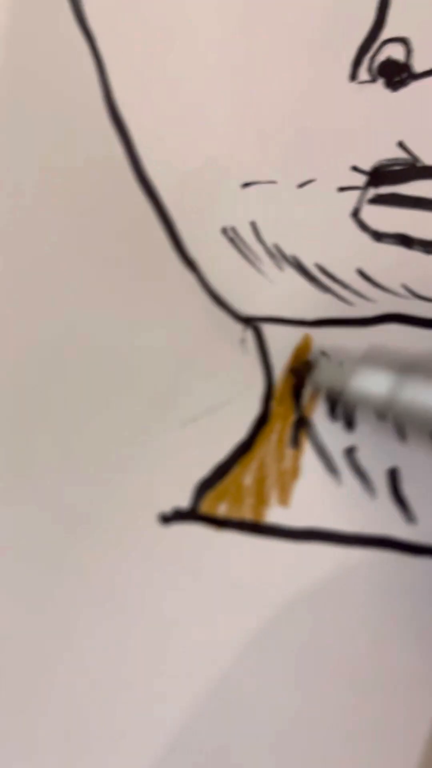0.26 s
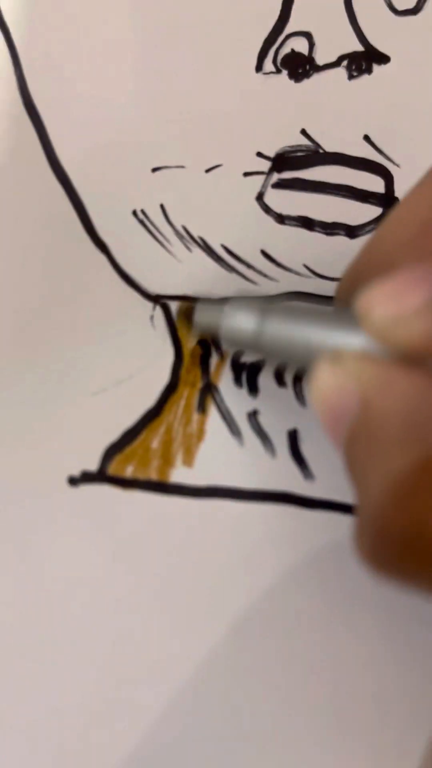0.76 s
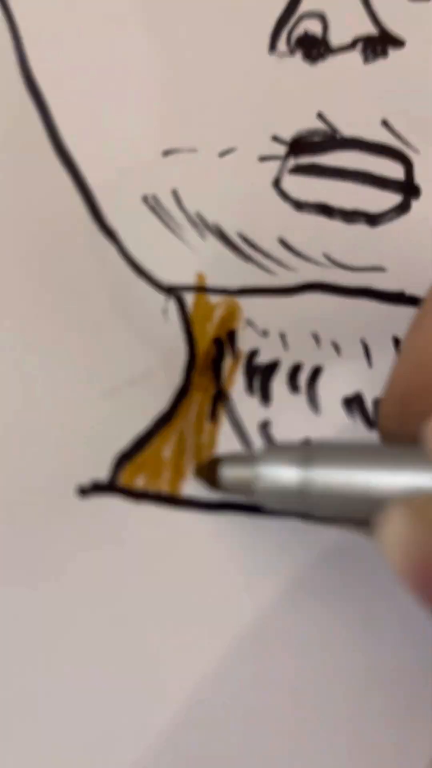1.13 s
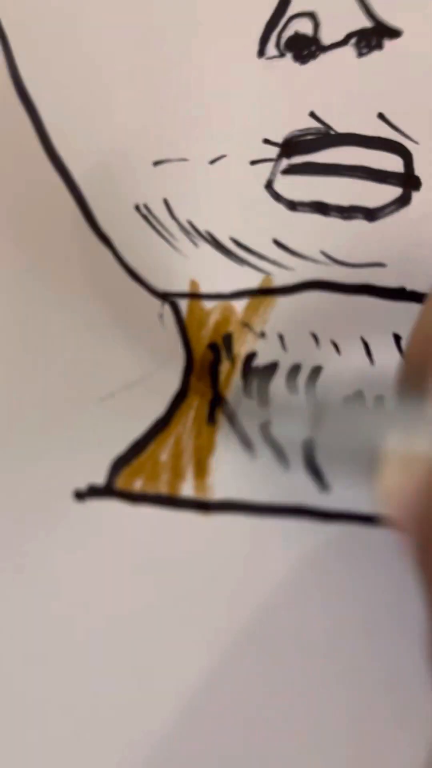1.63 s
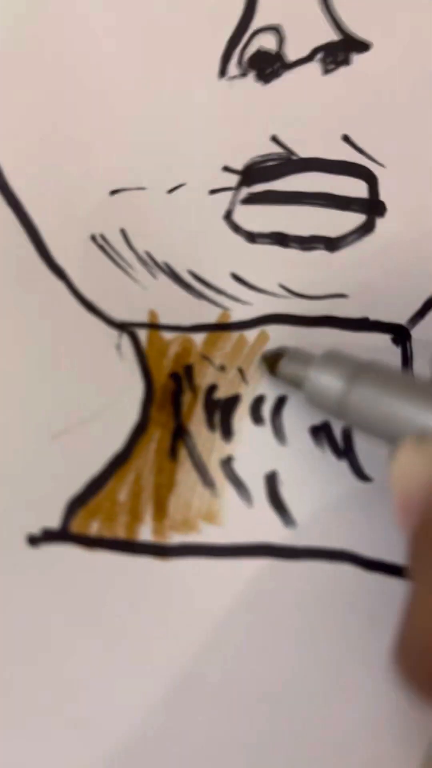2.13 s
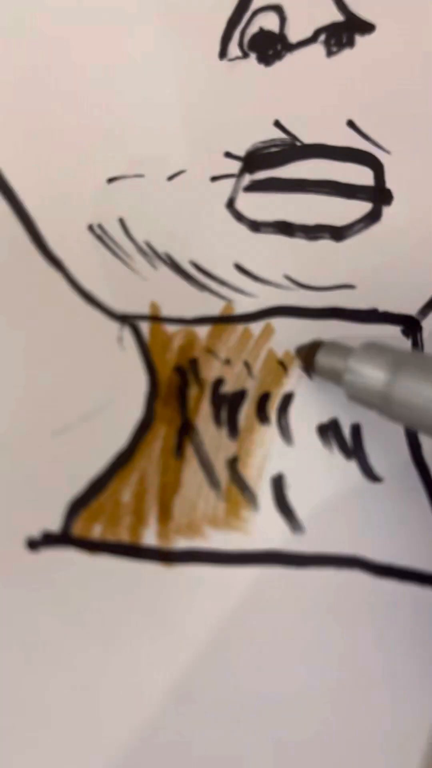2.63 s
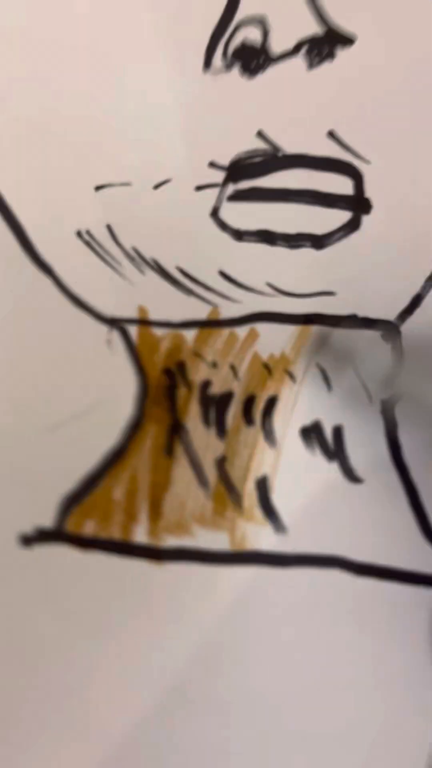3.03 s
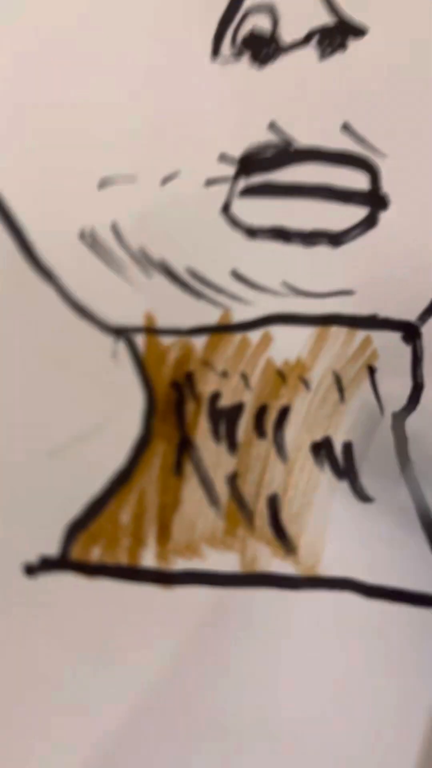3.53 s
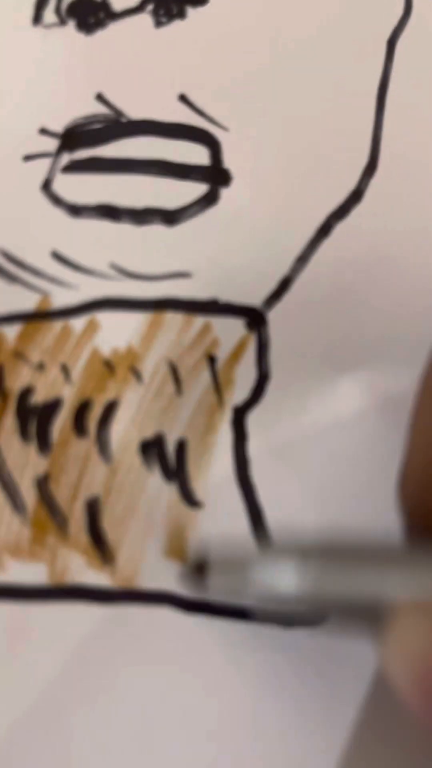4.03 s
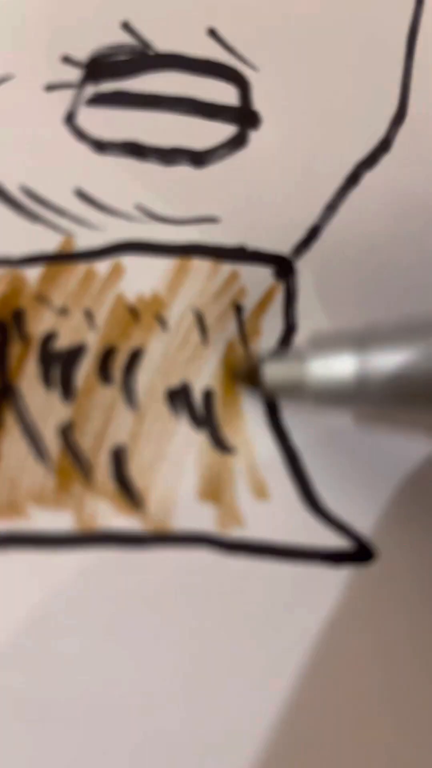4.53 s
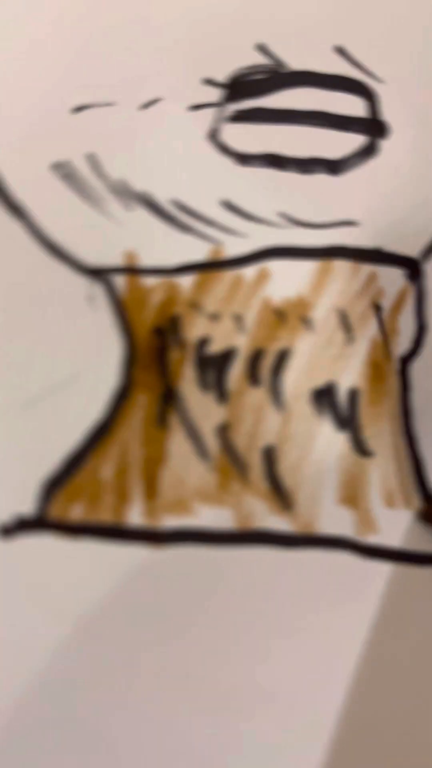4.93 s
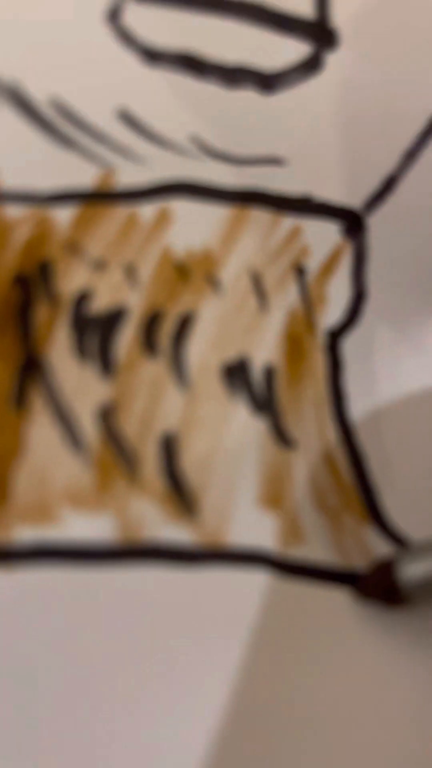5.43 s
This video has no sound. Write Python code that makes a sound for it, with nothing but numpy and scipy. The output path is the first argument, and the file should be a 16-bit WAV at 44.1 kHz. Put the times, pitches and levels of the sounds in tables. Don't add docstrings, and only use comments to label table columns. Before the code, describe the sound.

A hand scrubs a marker to and fro on paper near a phone in a small indoor space. Dry rasp, bright fibre hiss and thin squeaky edges pulse with each stroke, over a soft desk rumble. The scrubbing starts nearly silent, peaks midway and fades into lighter, irregular rubs with knocks and ticks. A low hum continues underneath throughout.

```python
import sys
import numpy as np
from scipy import signal
from scipy.fft import rfft, irfft, next_fast_len
from scipy.io import wavfile
from scipy.ndimage import uniform_filter1d, map_coordinates

SR = 44100
rng = np.random.default_rng(int(sys.argv[2]) if len(sys.argv) > 2 else 0)


def file_out(sig):
    cols = np.atleast_2d(sig).T
    lim = np.clip(cols, -1, 1)
    pcm = np.round(lim * 32767).astype(np.int16)
    wavfile.write(sys.argv[1], SR, pcm)


def voltage_ratio(decibels):
    exponent = np.asarray(decibels, float) / 20
    return 10 ** exponent


N = 249606
TIME_S = np.arange(N) / SR
FULL_SPEED_DB = -26


def unit(x):
    return x / np.sqrt(np.mean(x ** 2) + 1e-20)


def along(points, hz):
    f, v = np.transpose(points)
    return np.interp(np.log(hz + 1), np.log(f + 1), v)


def over_time(points):
    return np.interp(TIME_S, *np.transpose(points))


def wobble(rate):
    knots = rng.standard_normal(16000)
    return map_coordinates(knots, [np.arange(N) * rate / SR])


def filtered(x, response):
    m = next_fast_len(N + 8192)
    return irfft(rfft(x, m) * response(np.fft.rfftfreq(m, 1 / SR)), m)[..., :N]


def grit(spectrum, spread_db, patchy_db):
    slips = rng.standard_normal(N) * voltage_ratio(spread_db * rng.standard_normal(N))
    _, _, z = signal.stft(slips, SR, nperseg=256)
    patches = uniform_filter1d(rng.standard_normal(z.shape), size=4, axis=0)
    patches = uniform_filter1d(patches, size=6, axis=1)
    x = signal.istft(z * voltage_ratio(patchy_db * unit(patches)), nperseg=256)[1][:N]
    return unit(filtered(x, lambda hz: voltage_ratio(along(spectrum, hz))))


def marker():
    squeak = squeaks()
    tip = bright_hiss() + barrel_hiss() + paper_rasp() + squeak
    return voltage_ratio(0.99 * wobble(70)) * tip + desk_rumble()


def strokes():
    # (start [s], length [s], tip speed as hiss level [dB])
    pushes = [(0, 0.06, -69), (0.159, 0.074, -51.5), (0.345, 0.074, -41.5), (0.496, 0.056, -43),
              (0.569, 0.068, -40.5), (0.651, 0.077, -46), (0.831, 0.094, -43.5), (1.01, 0.11, -36.5),
              (1.208, 0.1, -31), (1.4, 0.102, -29.5), (1.596, 0.1, -28.5), (1.784, 0.096, -26.5),
              (1.967, 0.09, -26.5), (2.138, 0.1, -28.5), (2.306, 0.095, -30), (2.485, 0.093, -27),
              (2.674, 0.083, -23.5), (2.854, 0.103, -25), (3.044, 0.1, -25.5), (3.23, 0.098, -26.5),
              (3.415, 0.1, -25.5), (3.59, 0.096, -27), (3.788, 0.094, -27.5), (3.973, 0.096, -31.5),
              (4.171, 0.1, -34), (4.371, 0.12, -37), (4.596, 0.085, -34.5), (4.817, 0.1, -33.5),
              (5.063, 0.074, -40)]
    # (start [s], length [s], tip speed as hiss level [dB])
    pulls = [(0.08, 0.068, -54), (0.258, 0.11, -44.5), (0.75, 0.07, -45), (0.942, 0.097, -42.5),
             (1.128, 0.082, -31.5), (1.31, 0.091, -30), (1.504, 0.093, -30), (1.699, 0.086, -29),
             (1.882, 0.073, -25.5), (2.059, 0.066, -25.5), (2.234, 0.068, -26.5), (2.404, 0.078, -28.5),
             (2.579, 0.07, -25.5), (2.763, 0.07, -23), (2.958, 0.08, -26), (3.142, 0.074, -24.5),
             (3.327, 0.078, -26.5), (3.512, 0.068, -24.5), (3.689, 0.075, -28.5), (3.887, 0.072, -29.5),
             (4.075, 0.082, -32.5), (4.281, 0.092, -35), (4.488, 0.076, -34), (4.698, 0.13, -42),
             (4.929, 0.084, -47), (5.156, 0.096, -46.5), (5.276, 0.1, -42.5), (5.491, 0.059, -50),
             (5.56, 0.13, -43.5)]
    moves = [(s, length, 1.38, db, -1) for s, length, db in pushes]
    for s, length, db in pulls:
        skew = max(0.98 + 0.03 * (db - FULL_SPEED_DB), .3)
        moves.append((s, length, skew, db, 1))
    return np.array(sorted(moves))


def arch(levels_db, power, stick=-1):
    break_free = 5.8
    gain = np.zeros(N + SR)
    for (s, length, skew, *_), db in zip(strokes(), levels_db):
        u = (np.arange(round(length * SR)) / (length * SR)) ** skew
        grip = 1.7 - 1.0 * u
        speed = np.tanh(grip * np.abs(np.sin(np.pi * u))) * 1.168
        moving = np.clip(break_free * (speed - stick), 0, 1)
        gain[round(s * SR):][:len(u)] += voltage_ratio(db) * speed ** power * moving
    return gain[:N]


def between(levels_db):
    s, length, *_ = strokes().T
    return voltage_ratio(np.interp(TIME_S, s + length / 2, levels_db))


def pressure_db():
    # (time [s], rasp level [dB])
    pressing = [(0, -60.5), (.2, -56.5), (.37, -49), (.65, -46.5), (.95, -43.5), (1.3, -43.5), (1.75, -41),
                (2.15, -39.5), (2.4, -41.5), (2.8, -36.5), (3.5, -40.5), (3.85, -46.5), (4.2, -47),
                (4.62, -41.5), (5.1, -44.5), (5.4, -44), (5.66, -35)]
    s, length, *_ = strokes().T
    return np.interp(s + length / 2, *np.transpose(pressing))


def bright_hiss():
    # (frequency [Hz], level [dB per Hz])
    fibres = [(2500, -33), (4400, -20), (5300, -18), (6300, 2), (7400, 1), (8300, 0), (9600, 2.5),
              (11000, 2), (12000, -8), (12700, 1), (14000, -3.5), (15800, -8.5)]
    _, _, _, hiss_db, pull = strokes().T
    gain = arch(hiss_db - 3.5 + .5 * pull, power=2.1) + between(hiss_db - 50.0)
    return gain * grit(fibres, spread_db=-1.0, patchy_db=3.2)


def barrel_hiss():
    # (frequency [Hz], level [dB per Hz])
    barrel = [(2000, -14.5), (3500, -5.5), (4300, -3.5), (5050, 3.5), (6000, -4), (7200, -9), (10500, -8.5),
              (11500, -32), (16000, -9)]
    _, _, _, hiss_db, pull = strokes().T
    gain = arch(hiss_db - 8.0 - .5 * pull, power=1.0) + between(hiss_db - 73.0)
    return gain * grit(barrel, spread_db=-1.0, patchy_db=5.0)


def paper_rasp():
    # (frequency [Hz], level [dB per Hz])
    sheet = [(300, -5), (500, -4.5), (800, -5.5), (1500, -3.5), (2000, -1), (2700, -3), (3600, -3),
             (5000, -12), (9000, -21)]
    pull = strokes()[:, 4]
    rasp_db = pressure_db() - 1.88 * pull
    gain = arch(rasp_db, power=0.74, stick=0.133) + between(rasp_db - 16)
    return gain * grit(sheet, spread_db=3.0, patchy_db=3)


def squeaks():
    # (resting pitch [Hz], climb at full speed [Hz], width [Hz])
    pitches = [
        (4800, 510, 750),
        (6690, 710, 1300),
        (10030, 1000, 2500),
    ]
    # (pen roll [turns], level against the hiss [dB])
    facing = [(-0.0097, -10.5), (.33, -3), (-0.32, -5)]
    # (time [s], roll [turns])
    pen_roll = [(0, 0.0016), (.6, -0.11), (1.1, -0.2), (1.6, 0.11), (2.1, -0.03), (3.1, 0.11), (3.6, -0.16),
                (4, 0.033), (4.55, -0.28), (4.8, -.17), (5.201, 0.094), (5.66, .4)]
    hiss_db = strokes()[:, 3]
    speed = arch(0 * hiss_db, power=0.97) + .35 * wobble(20)
    roll = over_time(pen_roll)
    out = np.zeros(N)
    for (hz, climb, width), (turns, db) in zip(pitches, facing):
        gain = voltage_ratio(db - 14 * np.sin(np.pi * (roll - turns)) ** 2)
        tone = np.sin(2 * np.pi * np.cumsum(hz + climb * speed) / SR)
        out += gain * unit(wobble(width) * tone)
    return arch(hiss_db, power=1.54) * out


def desk_rumble():
    # (frequency [Hz], level [dB per Hz])
    desk = [(25, -13), (45, 0.5), (70, 4.5), (130, 2), (220, -2), (340, -1.5), (500, -8), (800, -22),
            (1500, -28)]
    # (time [s], rumble level over the rasp [dB])
    hand = [(0, 16), (.4, 5), (.8, 0.5), (1.5, 2.5), (3, 2.5), (4, 6.5), (4.6, -0.5), (5.3, 2.5), (5.4, 6),
            (5.52, -1.5)]
    _, _, _, hiss_db, pull = strokes().T
    desk_db = pressure_db() + 1.45 * pull + 0.17 * (hiss_db - FULL_SPEED_DB)
    steady = 0.76
    shake = steady * between(desk_db) + (1 - steady) * arch(desk_db + 3.0, power=0.67)
    weight = voltage_ratio(over_time(hand) + 2.47 * wobble(24.937))
    return shake * weight * grit(desk, spread_db=3.0, patchy_db=1.0)


def knocks(events, t60, sag, rough, boost_db):
    out = np.zeros(N + SR)
    t = np.arange(SR // 8) / SR
    for s, db, hz in events:
        bend = sag * t60 / 9 * (1 - np.exp(-9 * t / t60))
        ring = np.sin(2 * np.pi * hz * (0.766 * t + bend))
        band = signal.butter(N=2, Wn=[hz / 2, hz * 2], btype="band", fs=SR)
        puff = unit(signal.lfilter(*band, rng.standard_normal(len(t))))
        fade = voltage_ratio(db + boost_db - 60 * t / t60) * (1 - np.exp(-t * hz * 3))
        out[round(s * SR):][:len(t)] += fade * (ring + rough * puff)
    return out[:N]


def hand_thumps():
    # (time [s], peak level [dB], desk pitch [Hz])
    thumps = [(1.142, -32, 220.3), (1.322, -28, 164), (1.511, -28, 315.2), (2.017, -26.5, 124),
              (2.122, -23, 147), (2.197, -20.5, 145), (2.406, -31, 120.4), (2.576, -24, 280),
              (2.703, -29.5, 118), (2.784, -22, 305), (2.934, -21.5, 319.8), (3.51, -27, 144),
              (3.698, -37, 196), (3.864, -20, 239.3), (3.913, -25, 212), (3.957, -30.5, 151.2),
              (4.04, -24, 170), (4.086, -22, 129.7), (4.243, -20.5, 200), (4.433, -31.5, 176.3),
              (4.681, -29.5, 127), (4.719, -40, 133.6), (4.822, -28, 134), (5.361, -23, 126),
              (5.385, -25, 171), (5.405, -27.5, 140), (5.432, -23, 148), (5.455, -35, 191),
              (5.648, -31.5, 330)]
    return knocks(thumps, t60=0.082, sag=0.6, rough=0.47, boost_db=-1.0)


def tip_ticks():
    # (time [s], peak level [dB], pitch [Hz])
    ticks = [(0.08, -53, 3000), (0.25, -34, 684), (0.758, -32, 1940), (0.942, -32, 1910),
             (1.126, -33, 1750), (1.316, -28, 2066), (1.507, -29, 1200), (2.504, -27.5, 615),
             (2.769, -21.5, 2070), (2.866, -28, 1860), (2.936, -19, 905), (2.985, -23, 942),
             (3.4, -27, 678), (3.719, -23, 893), (3.743, -32, 824), (3.863, -30.5, 622), (3.913, -26, 983),
             (4.268, -18.5, 1007), (4.274, -22, 2020), (4.279, -22, 1127), (4.6, -34, 1605),
             (4.7, -32, 1280), (4.822, -22.5, 900), (4.934, -35.5, 960), (5.32, -29.5, 980),
             (5.378, -27.5, 850), (5.4, -26, 884), (5.431, -26, 732), (5.496, -32, 1970),
             (5.559, -29.5, 2000)]
    return knocks(ticks, t60=0.027, sag=0.3, rough=1.01, boost_db=-6.0)


def room():
    # (multiple of shaft speed, level [dB rms])
    hum_parts = [(2, -41), (3, -53), (4, -62.5), (5, -59), (7, -60), (8, -65.5)]
    # (frequency [Hz], level [dB per Hz])
    air = [(25, -19), (60, 4), (130, -6), (300, -7), (600, -10), (1500, -22), (3000, -29), (8000, -29),
           (16000, -34)]
    shaft_hz = 44.2 * (1 + 0.0024 * wobble(3.25))
    turns = np.cumsum(shaft_hz) / SR
    swell = voltage_ratio(3 + 1.3 * wobble(6))
    hum = swell * sum(voltage_ratio(db) * np.sin(2 * np.pi * k * turns) for k, db in hum_parts)
    breath = voltage_ratio(-51.0 + 5.0 * wobble(4.47))
    return hum + breath * grit(air, spread_db=2.5, patchy_db=3.5)


def scene():
    mono = marker() + hand_thumps() + tip_ticks() + room()
    return np.array([mono, mono])


def stereo_spread(dry):
    # (frequency [Hz], lead [half turns])
    lead = [(30, 0), (600, -.28), (1000, -.08), (1800, .03), (2760, .75), (3700, .45), (5000, .42),
            (6050, 1.0), (8150, 2.0), (10300, 3.0), (12500, 4.0), (14500, 5.0), (16000, 5.33)]
    # (frequency [Hz], level difference [dB])
    tilt = [(60, -1.0), (99, -1.0), (160, -2.0), (270, -3.5), (450, -4.0), (740, -5.5), (1220, -2.5),
            (2010, -1.5), (3330, -2.5), (5500, -1.5), (9080, 0.0), (15000, 0.0)]
    # (frequency [Hz], level against the direct sound [dB])
    stray = [(60, -26), (400, -19), (750, -3), (1200, -0.5), (1700, -9), (2700, -4.5), (4400, -13),
             (5500, -10), (16000, -16.5)]
    half = np.array([[.5], [-.5]])
    direct = filtered(dry, lambda hz: np.exp(1j * np.pi * half * along(lead, hz)))
    z = signal.stft(dry, nperseg=256)[2]
    new_phase = np.exp(2j * np.pi * rng.random(z.shape))
    scattered = signal.istft(z * new_phase, nperseg=256)[1][:, :N]
    both = direct + filtered(scattered, lambda hz: voltage_ratio(along(stray, hz)))
    return filtered(both, lambda hz: voltage_ratio(half * along(tilt, hz)) * (hz < 15780))


def roll_off(x):
    return signal.sosfilt(signal.butter(12, 15910, fs=SR, output="sos"), x)


def record(dry):
    mix = stereo_spread(dry)
    return roll_off(mix)


dry = scene()
out = record(dry)
file_out(out)
```